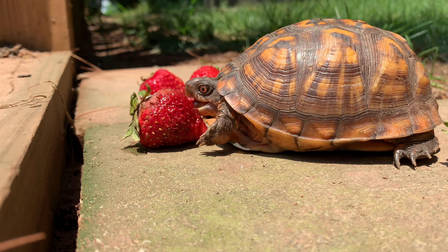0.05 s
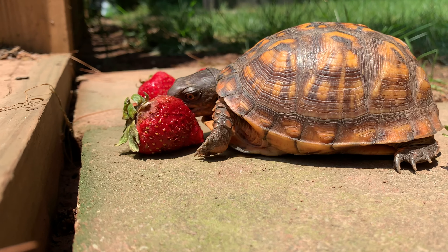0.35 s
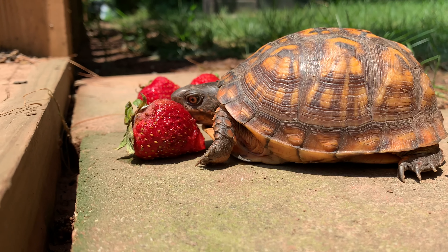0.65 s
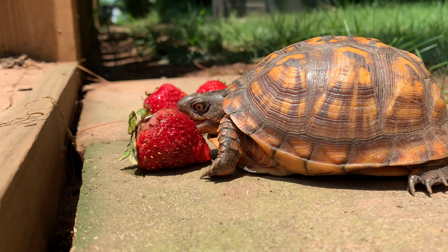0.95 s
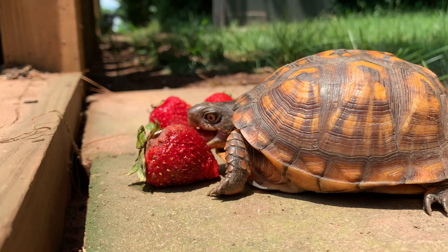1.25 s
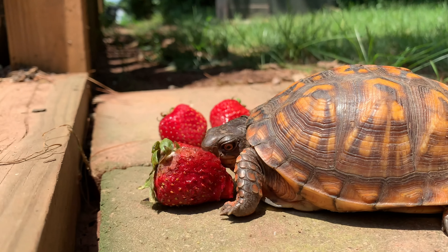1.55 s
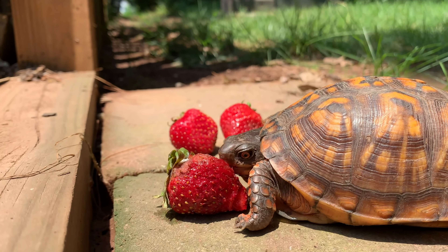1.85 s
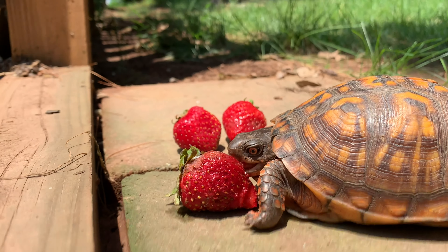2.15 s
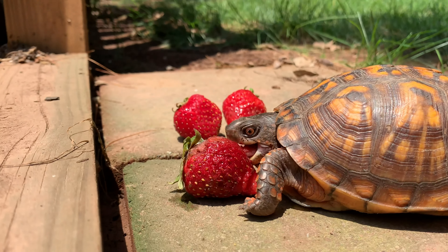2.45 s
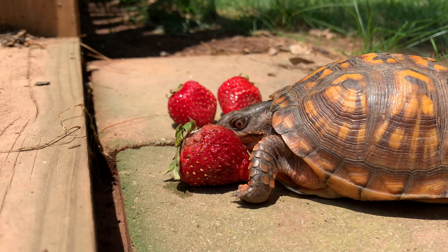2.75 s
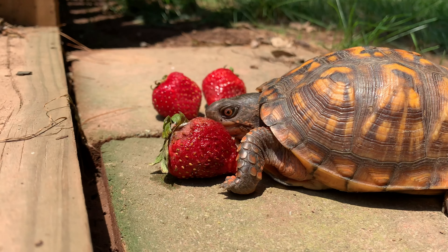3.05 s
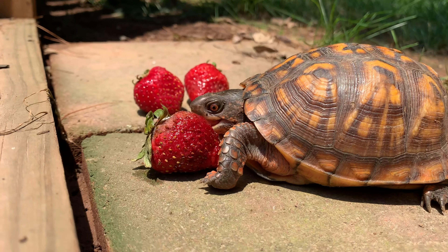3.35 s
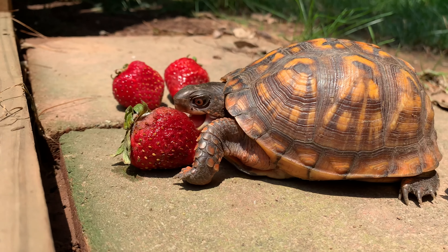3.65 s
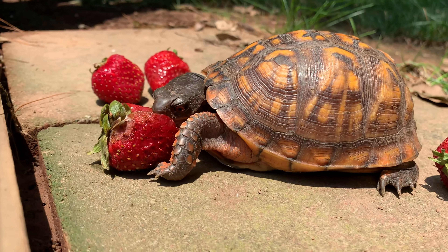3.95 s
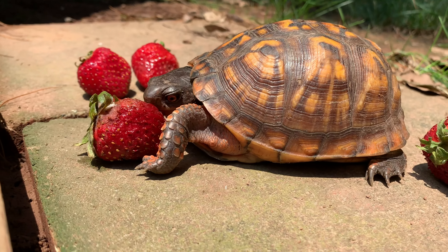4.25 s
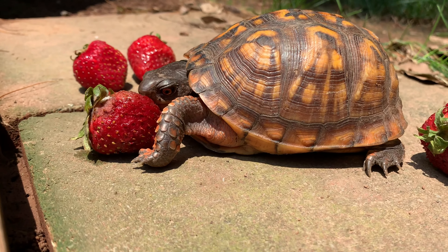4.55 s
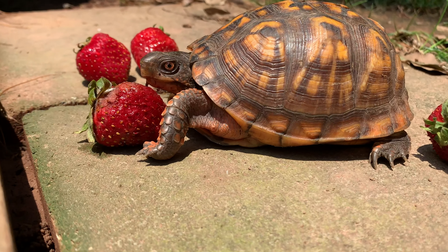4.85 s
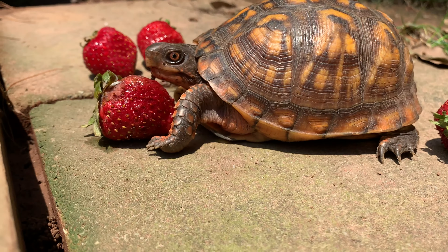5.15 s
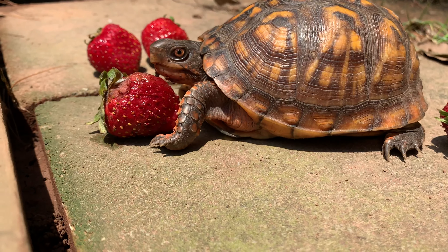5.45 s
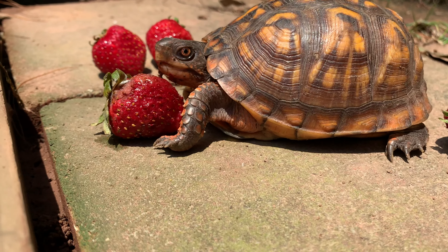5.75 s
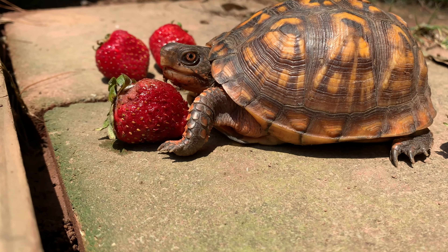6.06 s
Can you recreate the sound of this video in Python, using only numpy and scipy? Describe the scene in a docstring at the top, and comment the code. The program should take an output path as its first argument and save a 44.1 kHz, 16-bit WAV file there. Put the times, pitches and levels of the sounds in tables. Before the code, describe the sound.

Short, echoing bird whistles come and go above a steady low rumble, broken by a close double click and light handling knocks.

```python
"""A garden path, where a turtle noses unheard at strawberries and songbirds call from the trees.
Each bird whistles short, trilled notes, and leaves and walls scatter them into trailing echoes.
Close by come one sharp double click, lighter clicks, soft bumps and small ticks, as of a camera
being handled: each is a tap that makes something ring for a moment.
Behind it all are the hum and rumble of a distant machine, a light breeze and a thin hiss."""
import sys
import numpy as np
from scipy import signal
from scipy.fft import rfft, irfft
from scipy.io import wavfile

SR = 44100
rng = np.random.default_rng(int(sys.argv[2]) if len(sys.argv) > 2 else 0)


def waveform_to_disk(signal):
    """Save audio, clipped to [-1, 1], as 16-bit WAV at the path in sys.argv[1]."""
    frames = np.transpose(np.atleast_2d(signal))
    scaled = np.clip(frames, -1, 1) * 32767
    samples = np.round(scaled).astype(np.int16)
    wavfile.write(sys.argv[1], SR, samples)


N = 269892
T = np.arange(N) / SR


def songbirds():
    """Birds call from the trees around, one short whistle after another."""
    # bird notes: t/s, length/s, start f/Hz, middle f/Hz, end f/Hz, trill depth before scaling/Hz,
    # level/dB, direct sound over echo/dB, left minus right/dB
    notes = [(0, 0.032, 4450, 4420, 4370, 90, -58, -1, -2),
             (.148, 0.044, 4475, 4407, 4440, 63, -44, -5.5, -1.5),
             (.198, 0.068, 4410, 4144, 4050, 77, -40, -1.5, 1),
             (.16, 0.15, 5560, 6030, 5980, 170, -53.5, -14, -0.5),
             (.16, 0.061, 9100, 8750, 8370, 240, -62.5, 0, -3),
             (.404, 0.041, 2590, 2270, 2160, 110, -53, -7.5, -3),
             (.475, 0.063, 3110, 3420, 3400, 20, -58.5, -13, 1),
             (.485, 0.019, 1780, 1730, 1680, 22, -55, 0, 0),
             (.51, 0.062, 5100, 4820, 4580, 820, -58, -6, 1),
             (.552, 0.036, 2310, 2473, 2560, 30, -53.5, -12, 0),
             (.598, 0.035, 3750, 4400, 4650, 82, -53, -8, -2),
             (.635, 0.1, 4290, 4550, 4740, 710, -54, -4, 0), (.74, 0.089, 5350, 5520, 5660, 120, -60, 1, 1),
             (.745, 0.067, 2170, 2080, 2020, 22, -59.5, 6, -4),
             (.87, 0.031, 3590, 3800, 4040, 100, -63, -3, 5),
             (1.026, .1, 5140, 4160, 3940, 440, -58.5, -7, 2),
             (1.378, 0.042, 4610, 4640, 4520, 360, -54, -14, -4),
             (1.38, 0.051, 2106, 1910, 1860, 16, -58.5, -4, 0),
             (1.384, 0.042, 4080, 4010, 3870, 40, -53, -5, 0),
             (1.39, 0.043, 3540, 3320, 3070, 87, -51.5, -12, 3),
             (1.43, 0.05, 4220, 4150, 3880, 410, -48.5, 1, 1),
             (1.44, 0.042, 3820, 3825, 3730, 30, -49.5, 7, 1),
             (1.54, 0.049, 2750, 2990, 2980, 81, -55, -11, -1),
             (1.543, 0.025, 5290, 5320, 5250, 70, -55, -3, -2),
             (1.57, 0.043, 4700, 4550, 4400, 220, -60, -12, 0),
             (1.55, 0.036, 5800, 5900, 6000, 40, -63, 0, -1),
             (1.585, 0.032, 2380, 2290, 2270, 35, -55.5, -11, -3),
             (1.73, 0.092, 2376, 2310, 2280, 60, -64, -8, -2),
             (1.605, 0.047, 5200, 5230, 5080, 140, -56, -16, 1),
             (1.625, 0.055, 2470, 2540, 2700, 42, -59, -8, -1),
             (1.675, 0.06, 3825, 3740, 3724, 85, -53, 2, 3.5),
             (1.703, 0.023, 2650, 3070, 3460, 100, -57, 0, 3),
             (1.9, 0.12, 4500, 4470, 4210, 300, -62.5, -7, 1),
             (2.023, 0.057, 6580, 6220, 6020, 130, -43, -8, -3.5),
             (2.05, 0.078, 6020, 5770, 5550, 400, -47, 1, -1),
             (2.145, 0.059, 5720, 5560, 5470, 110, -50, -2, 2),
             (2.222, 0.07, 5380, 5320, 5320, 67, -45.5, 2.5, -2.5),
             (2.305, 0.057, 5380, 5270, 5060, 130, -51.5, -6.5, -1),
             (2.441, 0.052, 2185, 2400, 2830, 120, -50, -1, 2.5),
             (2.611, 0.042, 2916, 3375, 4200, 270, -49, -3, 1.5),
             (2.653, 0.038, 4026, 3540, 3250, 340, -49, -7.5, 0.5),
             (2.663, 0.11, 7350, 6480, 6140, 200, -59.5, 3, -1),
             (2.68, 0.057, 10250, 9400, 9000, 450, -64, -9, -4),
             (2.881, 0.037, 8380, 7670, 6700, 460, -45, -6.5, -2),
             (2.923, 0.097, 6360, 6870, 7000, 140, -50, 1, -2),
             (2.925, 0.087, 13500, 13800, 14400, 250, -68.5, 8, -2),
             (3.013, 0.035, 3550, 3950, 4200, 200, -56, -9, 1),
             (3.099, 0.03, 2140, 2184, 2500, 45, -53.5, -2.5, -3),
             (3.206, 0.11, 3540, 3613, 3690, 32, -51.5, -7.5, -1.5),
             (3.277, 0.084, 3330, 3210, 3300, 61, -43, 6.5, 1),
             (3.352, 0.026, 2380, 2280, 2290, 25, -55, 4, 1),
             (3.41, 0.046, 2297, 2535, 2950, 97, -52, 2, 4.5),
             (3.439, 0.038, 2790, 2466, 2200, 240, -49, -8, 0),
             (3.915, 0.048, 2444, 2200, 2000, 260, -54, -2, -2),
             (3.945, 0.064, 5870, 6250, 6500, 230, -55.5, -2, -1),
             (3.95, 0.1, 12600, 12760, 13900, 470, -60.5, 5, 0),
             (3.982, 0.018, 4980, 4690, 4430, 250, -55, -6, 3),
             (4.02, 0.027, 6460, 6700, 6950, 200, -56, -10, -2),
             (4.07, 0.03, 5610, 5380, 5120, 100, -46.5, -3, -3),
             (4.11, 0.054, 5320, 5430, 5220, 31, -46.5, -12, 2),
             (4.085, 0.078, 10200, 10500, 10650, 130, -64, 0, -1),
             (4.22, 0.083, 14600, 14200, 13700, 550, -71, 4, 0),
             (4.272, 0.046, 1945, 2100, 2530, 350, -55, 1, -5),
             (4.35, 0.026, 3470, 3270, 3320, 84, -54, -10, 0),
             (4.406, 0.022, 4560, 4060, 2470, 47, -44.5, -5, 1),
             (4.442, 0.044, 2355, 2585, 2620, 110, -43.5, -0.5, 1),
             (4.523, 0.012, 2170, 2175, 2200, 30, -48.5, -7, -1),
             (4.57, 0.044, 2570, 2816, 2810, 30, -52, -7, 0),
             (4.573, 0.029, 3260, 3340, 3720, 33, -44, -3.5, 2),
             (4.616, 0.023, 3757, 3805, 3740, 180, -35.5, -8.5, -2),
             (4.652, 0.0654, 3720, 3570, 3530, 330, -38, 3.5, 1.5),
             (4.799, 0.036, 4790, 5580, 6650, 650, -49, -13, -0.5),
             (5.1, 0.064, 4600, 4200, 3950, 560, -57.5, -4, 2),
             (5.243, 0.025, 2950, 2470, 2020, 44, -58, -16, 2),
             (5.262, 0.049, 2050, 1950, 2000, 25, -54, 0, 2),
             (5.275, 0.088, 4300, 5300, 5650, 130, -58.5, -9, 1),
             (5.285, 0.031, 2530, 3050, 3130, 80, -55, -12, 1),
             (5.318, 0.015, 3200, 2660, 2300, 63, -53, 10, 2),
             (5.325, 0.023, 1960, 2274, 2680, 44, -42.5, -8, 1),
             (5.35, 0.037, 2910, 2620, 2340, 110, -52, -4, -1),
             (5.425, 0.08, 3580, 3820, 4080, 85, -61.5, -2, 0),
             (5.47, 0.033, 2460, 2494, 2470, 39, -48.5, -0.5, 0),
             (5.78, 0.042, 3950, 4110, 4180, 170, -62.5, -11, 3),
             (5.855, 0.036, 6100, 6040, 5940, 390, -54.5, -15, 1),
             (6.054, 0.03, 3950, 4800, 4830, 160, -45, -7, -1),
             (6.075, 0.035, 4020, 4280, 4340, 460, -53, 0, 0)]
    return sing(notes)


def sing(notes, trill_scale=0.91, trills_per_s=120):
    """Every note takes its own way through the garden; hidden birds arrive mostly as echo."""
    out = np.zeros((2, N))
    for start, length, *pitches, trill_hz, db, direct_db, pan_db in notes:
        note = whistle(length, pitches, trill_scale * trill_hz, trills_per_s * rng.uniform(.85, 1.15))
        heard = signal.fftconvolve(note[None], garden_echo(direct_db, pitches[1]), axes=1)
        heard *= np.sqrt(len(note) / np.sum(heard ** 2, axis=1, keepdims=True))  # keep the note's energy
        add(out, start, heard * undb(db) * sides(pan_db))
    return out


def whistle(length, pitches, trill_hz, trills_per_s, waver=0.005):
    """A bird's voice box slides through three pitches with a fast trill; the note swells and fades."""
    progress = np.linspace(0, 1, int(length * SR))
    wobble = wander(150, size=SR // 4)[:len(progress)]
    glide = np.polyval(np.polyfit([0, .5, 1], pitches, 2), progress)
    trill = np.sin(2 * np.pi * (trills_per_s * length * progress + rng.random()) + .5 * wobble)
    phase = 2 * np.pi * np.cumsum(glide * (1 + waver * wobble) + trill_hz * trill) / SR
    swell = np.sqrt(np.abs(np.sin(np.pi * progress))) * (1 + .5 * progress)
    overtone_db = -25 - 4 * np.log2(pitches[1] / 3970)  # higher notes have a weaker overtone
    return unit(swell * (np.sin(phase) + undb(overtone_db) * np.sin(2 * phase)))


def garden_echo(direct_db, hz, tail_s=1.08, tail_db=-10, build_s=0.0015, clump_db=3):
    """The direct sound, quick echoes off leaves and walls, and a longer tail from the trees."""
    t = np.arange(SR) / SR
    scatter_s = .43 * (hz / 3800) ** 0.37  # time to fade by 60 dB: leaves scatter high notes for longer
    fade = undb(-60 * t / scatter_s) + undb(tail_db - 60 * t / tail_s)
    fade *= 1 - np.exp(-t / build_s)
    fade *= undb(clump_db * wander(90, size=SR))  # echoes arrive in clumps, tree by tree
    path = rng.standard_normal((2, SR)) * fade / np.sqrt(np.sum(fade ** 2))
    path[[0, 1], rng.permutation(4)[:2]] += undb(direct_db)  # one ear hears the bird a moment earlier
    return path


def far_twitter(count=9, low_hz=2160, high_hz=5000, note_s=0.017, trill_hz=170, direct_db=-13):
    """Birds farther off sing rows of faint notes at random pitches, sliding up or down."""
    # spells of twittering: t/s, length/s, typical note level/dB
    spells = [(0.551, 0.21, -60), (1.659, 0.24, -64), (3.887, 1, -62), (5.081, 0.51, -59)]
    notes = []
    for start, length, db in spells:
        for k in range(count):
            late, height = rng.random(2)
            slope, loud, side = rng.standard_normal(3)
            when = start + length * (k + late) / count
            hz = low_hz * (high_hz / low_hz) ** height
            pitches = hz * np.exp(0.079 * slope * np.array([-1, 0, 1]))
            notes.append((when, note_s, *pitches, trill_hz, db + 2.5 * loud, direct_db, 2 * side))
    return sing(notes)


def clicks():
    """A small part rings brightly: one sharp double click and some lighter ones."""
    # sharp clicks: t/s, relative level/dB, brightness/(dB per octave)
    hits = [(.758, -48, 16), (2.2022, -35, -1), (2.2117, -19, -2), (2.2182, -20.5, 11), (2.2238, -33, 7),
            (2.2636, -31, 7), (2.2695, -43, 6), (2.2832, -39, 7), (3.445, -44, 1), (3.632, -39, -1),
            (3.865, -43, -2), (3.917, -40, 2), (4.843, -41, 1)]
    # ringing tones of the clicking part: f/Hz, width/Hz, relative level/dB
    tones = [(454, 110, 9), (1100, 140, 0.5), (1840, 440, -9), (4440, 270, 10), (6900, 290, 11),
             (8530, 440, 12), (9710, 340, 11), (12700, 510, 2), (14100, 640, -11)]
    return undb(0.5) * taps(hits, tones, contact_s=0.00074, grit=2.3, ear_difference=0.88)


def thumps():
    """The double click and its rebound jolt the body, which gives two hollow thumps."""
    # jolts: t/s, peak level/dB, brightness/(dB per octave)
    hits = [(2.2108, -19.5, 0), (2.2552, -25.5, -4)]
    # ringing tones of the jolted body: f/Hz, width/Hz, relative level/dB
    tones = [(112, 22, 3), (290, 150, -20), (425, 80, -5), (1060, 80, -11)]
    return taps(hits, tones, contact_s=0.0016, grit=0.026)


def scrape():
    """The part rubs briefly and brightly as it settles after the double click."""
    # loudness of the rub: t/s, level/dB
    levels = [(2.2, -87), (2.215, -52.5), (2.245, -65), (2.275, -60), (2.33, -71)]
    db = np.interp(T, *np.transpose(levels), left=-np.inf, right=-np.inf)
    return band_noise(low_hz=6860, high_hz=12600, order=2) * undb(db)


def bumps():
    """Soft knocks make the body ring low and die away fast."""
    # soft bumps: t/s, relative level/dB, brightness/(dB per octave)
    hits = [(.08, -33.5, 0.5), (.099, -30.5, -2), (.125, -29, -4), (2.2098, -27, -2), (2.368, -35.5, -6),
            (2.558, -33, -3.5), (3.352, -36, -2), (3.866, -37.5, 23), (4.428, -30, 0.5), (4.462, -39, -3),
            (4.511, -36, 0), (4.587, -29, -5), (4.652, -33, -1), (4.68, -39, -2), (4.841, -34.5, -0.5),
            (4.86, -34, 2), (4.877, -40, -1), (4.896, -41, 2)]
    # ringing tones of the bumped body: f/Hz, width/Hz, relative level/dB
    tones = [(105, 33, -7), (260, 310, 3.5), (466, 100, -0.5), (960, 310, -9.5), (1740, 740, -13.5)]
    return undb(-0.5) * taps(hits, tones, contact_s=0.0013, grit=0.22)


def ticks():
    """Tiny taps on the right make a part ring high, with the very top softened."""
    # small ticks: t/s, relative level/dB, brightness/(dB per octave)
    hits = [(.057, -47, 0), (.078, -51, 0), (.087, -50, 0), (.0965, -54, 0), (.119, -48, 0),
            (.1275, -50, 0), (.62, -58, -2), (.628, -54, -2), (2.1805, -51, -2), (2.3668, -53, -3)]
    # ringing tones of the ticking part: f/Hz, width/Hz, relative level/dB
    tones = [(2600, 2000, -32), (8210, 150, 23), (8700, 770, 13), (13500, 2500, -18)]
    ticking = taps(hits, tones, contact_s=0.00069, grit=0.7)
    soften = signal.butter(2, 10000, fs=SR, output="sos")
    return undb(8.5) * signal.sosfilt(soften, ticking) * sides(-13.5)


def taps(hits, tones, contact_s, grit, ear_difference=2.0):
    """A brief, gritty push sets an object's own tones ringing; wider tones die away sooner."""
    t = np.arange(SR // 10) / SR
    out = np.zeros((2, N))
    for start, peak_db, bright_db in hits:
        ring = 0
        for hz, width, db in tones:
            strength = undb(db + bright_db * np.log2(hz)) * width  # harder taps ring more brightly
            ring += strength * np.exp(-np.pi * width * t) * np.sin(2 * np.pi * hz * t)
        grain = rng.standard_normal(len(t)) + ear_difference * rng.standard_normal((2, len(t)))
        push = grit * grain * t / contact_s * np.exp(-(t / contact_s) ** 2)
        push[:, 0] += 1  # the clean first strike
        hit = signal.fftconvolve(push, ring[None], axes=1)
        add(out, start, hit / np.abs(hit).max() * undb(peak_db))
    return out


def machine_hum(pan_db=-1.84, drifts_per_s=5):
    """A far-off machine's motor and power supply hum; some tones waver on the way."""
    # machine tones: f/Hz, level/dB, unsteadiness (0 to 1)
    tones = [(43.6, -71, 0.85), (57.4, -53, 0.92), (76.47, -42.5, 0), (120.34, -40, 0.03), (148.5, -55, 0),
             (215.1, -61.5, 0), (239, -60.5, 0.43), (357.5, -63, 0.74)]
    hum = 0
    for hz, db, unsteady in tones:
        steady = np.exp(2j * np.pi * (hz * T + rng.random()))
        waver = 1 + unsteady * (wander(drifts_per_s) + 1j * wander(drifts_per_s))
        hum += undb(db) * unit((waver * steady).real)
    return hum * sides(pan_db)


def outdoor_air(level_db=-41.5, flicker_db=2.5):
    """Distant rumble and leaf hiss, flickering a little; only the low sounds are alike at both ears."""
    # tone colour of the background: f/Hz, relative level/dB
    colour = [(15, -19.5), (40, -4), (60, 2), (90, 1.5), (140, 0.5), (190, -9.5), (350, -13.5),
              (550, -20.5), (1000, -24), (1700, -31.5), (4500, -37.5), (7300, -40), (9500, -44),
              (11500, -66.5), (14000, -49.5), (16000, -86)]
    # how alike the two ears hear it: f/Hz, likeness (1 = the same)
    likeness = [(130, 0.9), (300, 0.76), (600, 0.46), (1200, 0.039), (8000, 0.066)]
    # how it leans to one side: f/Hz, left minus right/dB
    lean = [(100, 1.3), (300, -1.5), (1000, 2), (4000, -1)]
    hz = np.fft.rfftfreq(N, 1 / SR)
    shared, opposite = rfft(rng.standard_normal((2, N)))
    alike = along(likeness, hz)
    sign = np.array([[1], [-1]])
    ears = shared * np.sqrt(1 + alike) + sign * opposite * np.sqrt(1 - alike)
    noise = irfft(ears * undb(along(colour, hz) + sign * along(lean, hz) / 2), N)
    return unit(noise) * undb(level_db + flicker_db * wander(15))


def breeze(puff_db=3.5, puffs_per_s=13):
    """Light air pushes on the microphone in deep, uneven puffs, easing after the first second."""
    # strength of the breeze: t/s, typical level/dB
    levels = [(0, -43.5), (.8, -44), (1.1, -52.5), (6.12, -52.5)]
    db = np.interp(T, *np.transpose(levels)) + puff_db * wander(puffs_per_s)
    return band_noise(low_hz=35.2, high_hz=54, order=3) * undb(db)


def hiss():
    """A thin, high hiss creeps in halfway through."""
    # loudness of the hiss: t/s, level/dB
    levels = [(0, -117), (2.6, -88.5), (4.3, -70.5), (6.1, -73.5)]
    return band_noise(low_hz=7930, high_hz=9060, order=2) * undb(np.interp(T, *np.transpose(levels)))


def band_noise(low_hz, high_hz, order):
    """Noise between two frequencies, with an average strength of 1."""
    band = signal.butter(order, [low_hz, high_hz], "bandpass", fs=SR, output="sos")
    return unit(signal.sosfilt(band, rng.standard_normal(N)))


def undb(db):
    """Turn decibels into a number to multiply by."""
    return 10 ** (np.asarray(db) / 20)


def unit(x):
    """Scale a sound to an average strength (rms) of 1."""
    return x / np.sqrt(np.mean(x ** 2))


def along(points, hz):
    """Read between (frequency, value) points, giving every octave equal room."""
    f, value = np.transpose(points)
    return np.interp(np.log(hz + 1e-3), np.log(f), value)


def wander(rate, size=N):
    """A random curve around zero that turns about rate times a second."""
    knots = rng.standard_normal(size // 40 + 4)
    return 0.64 * np.interp(np.arange(size) / SR * rate, np.arange(len(knots)), knots)


def sides(db):
    """Left and right volumes, with the left louder by db."""
    return undb(np.array([[db], [-db]]) / 2)


def add(out, start_s, sound):
    """Mix a stereo sound in at its start time."""
    i = int(start_s * SR)
    out[:, i:i + sound.shape[1]] += sound[:, :max(N - i, 0)]


def scene():
    """Small noises close by, the background, and the birds around."""
    handling = clicks() + ticks() + bumps() + thumps()
    background = machine_hum() + outdoor_air() + breeze() + hiss()
    return handling + scrape() + background + songbirds() + far_twitter()


def record(dry, top_hz=15900):
    """Cut away the very highest treble."""
    return signal.sosfilt(signal.ellip(8, .2, 70, top_hz, fs=SR, output="sos"), dry)


dry = scene()
out = record(dry)
waveform_to_disk(out)
```